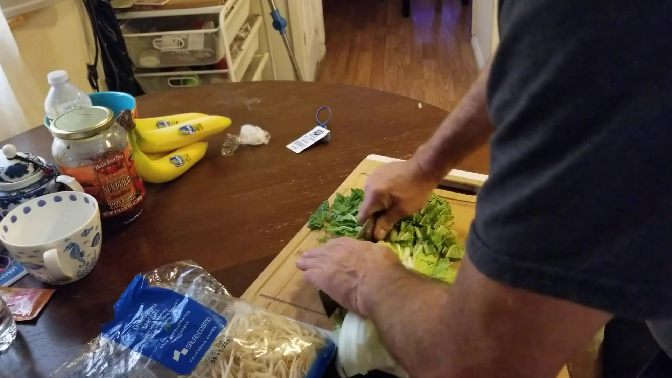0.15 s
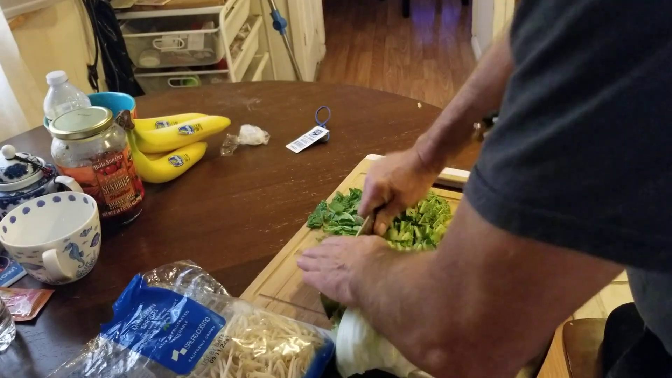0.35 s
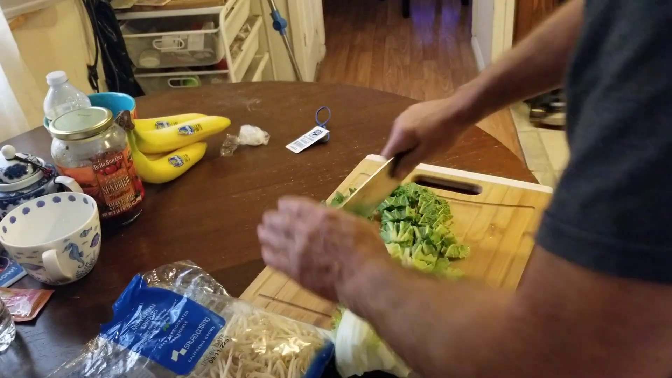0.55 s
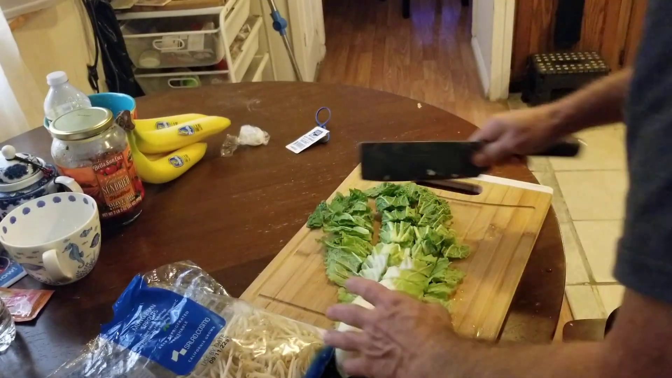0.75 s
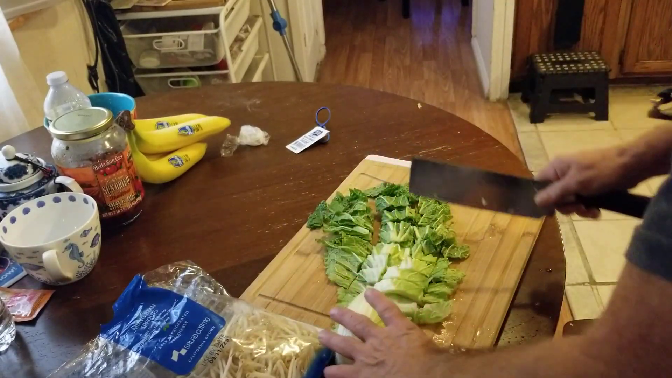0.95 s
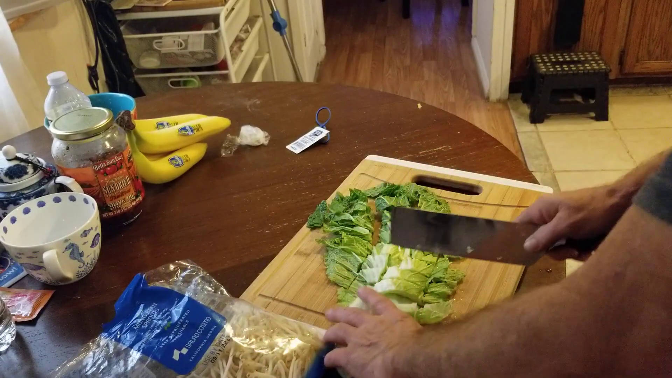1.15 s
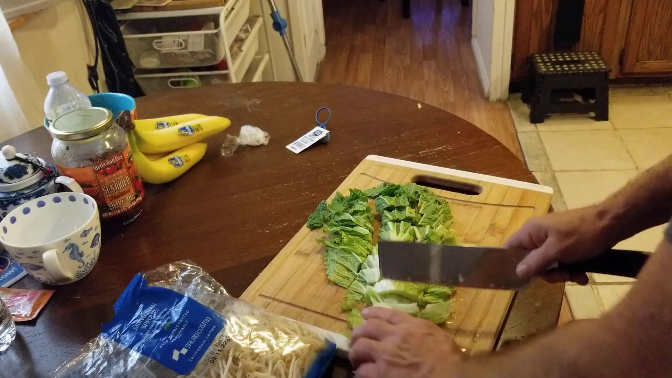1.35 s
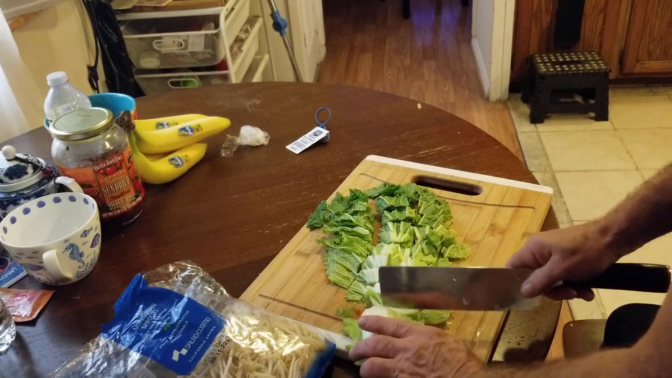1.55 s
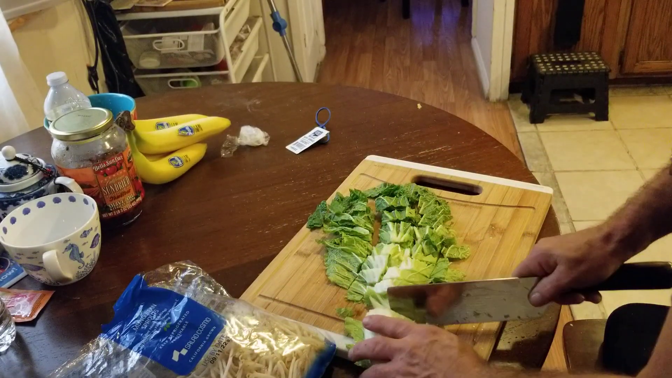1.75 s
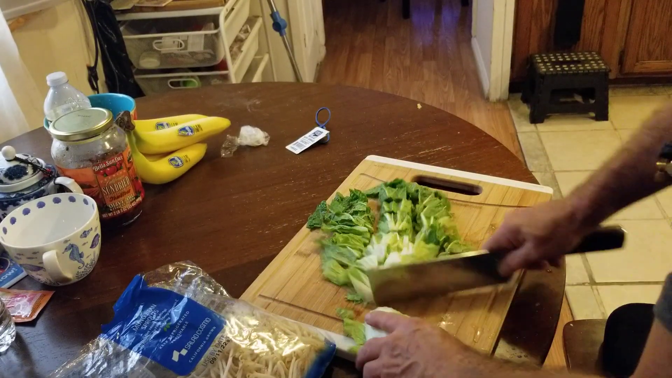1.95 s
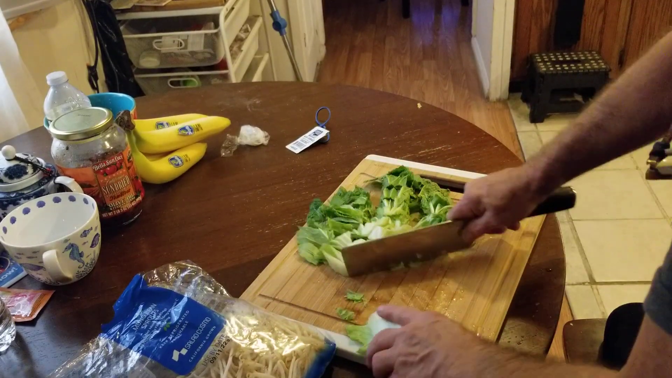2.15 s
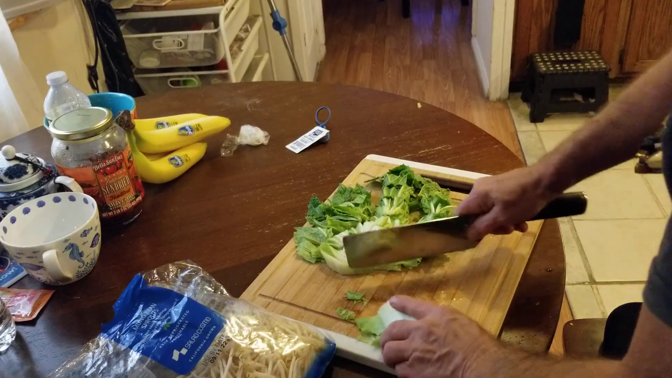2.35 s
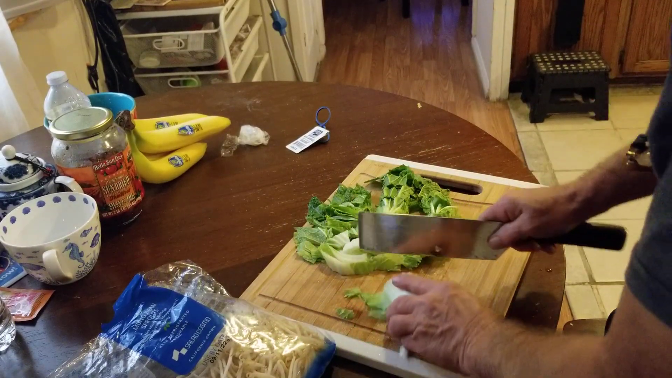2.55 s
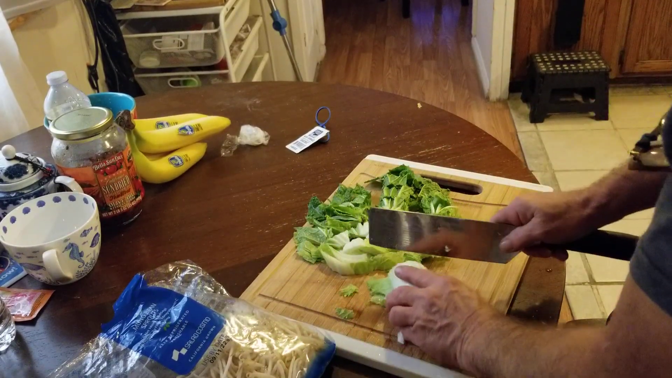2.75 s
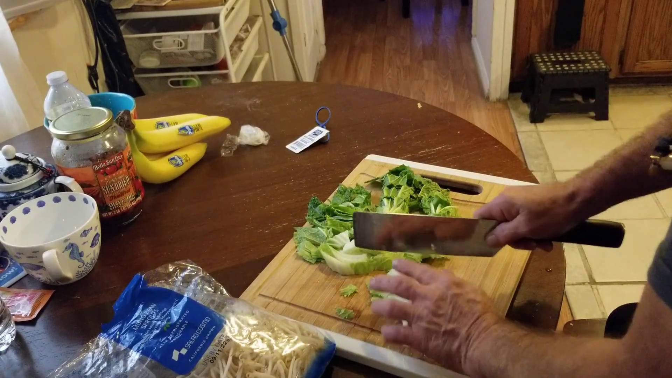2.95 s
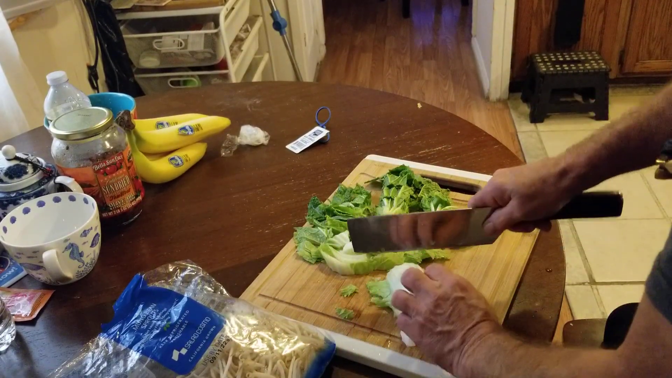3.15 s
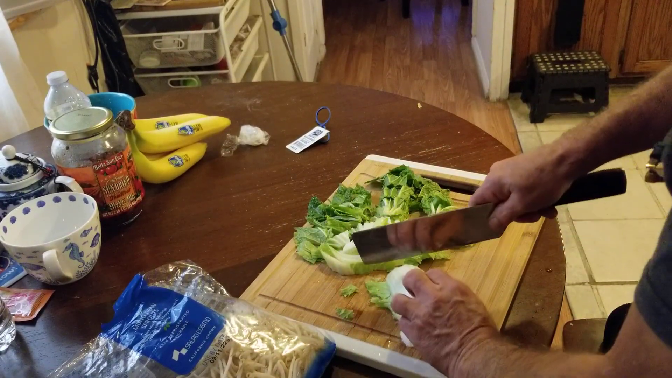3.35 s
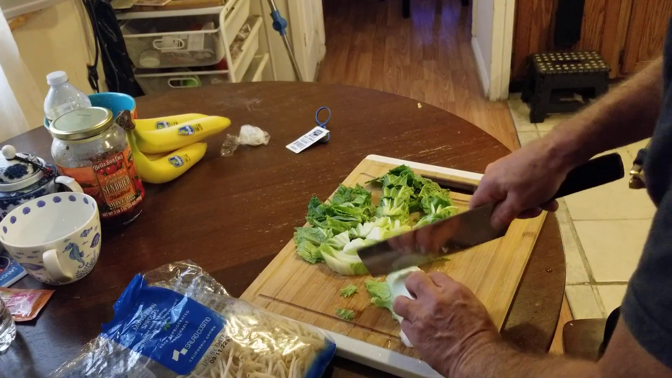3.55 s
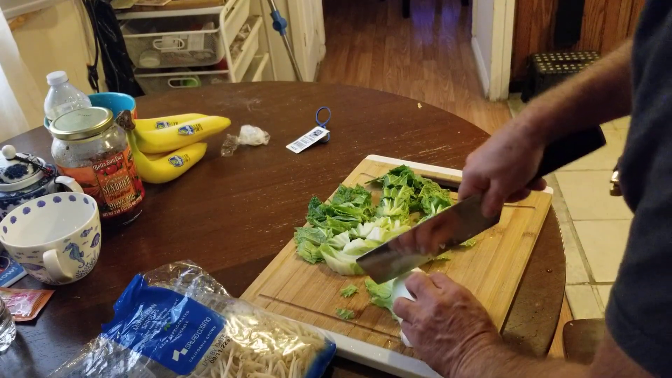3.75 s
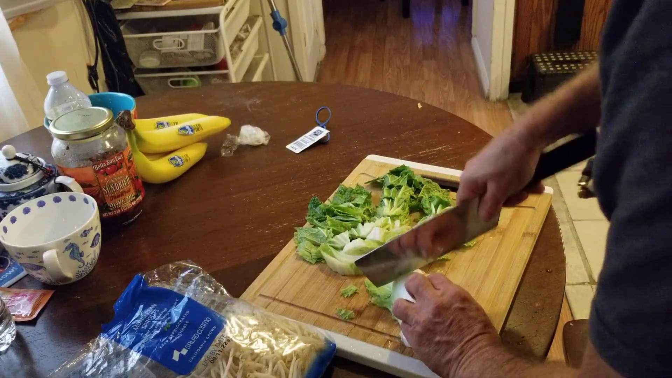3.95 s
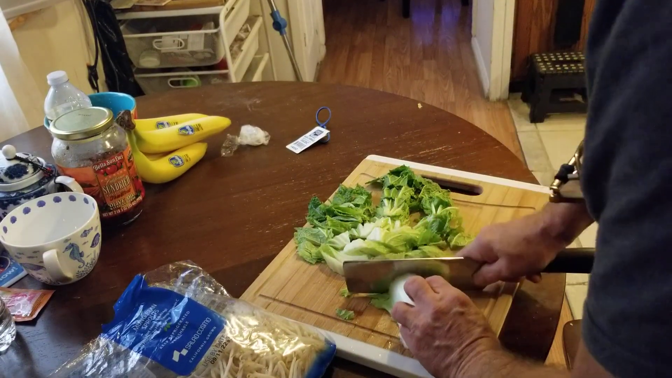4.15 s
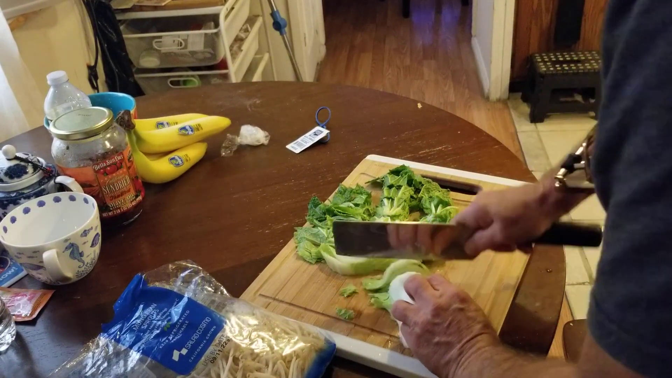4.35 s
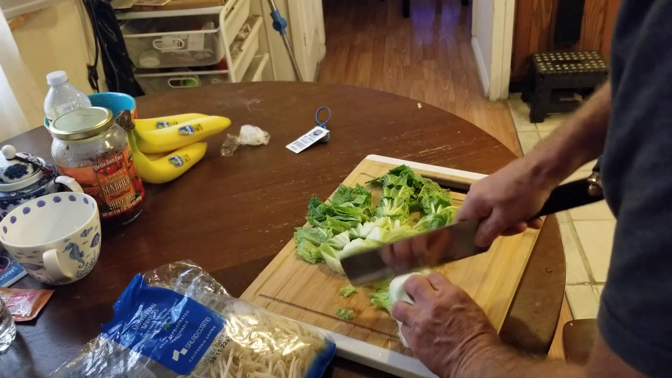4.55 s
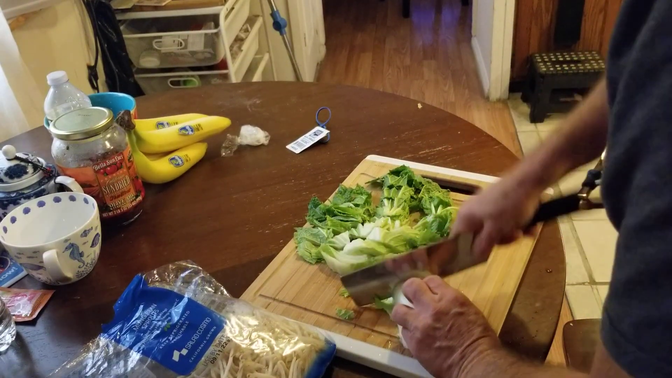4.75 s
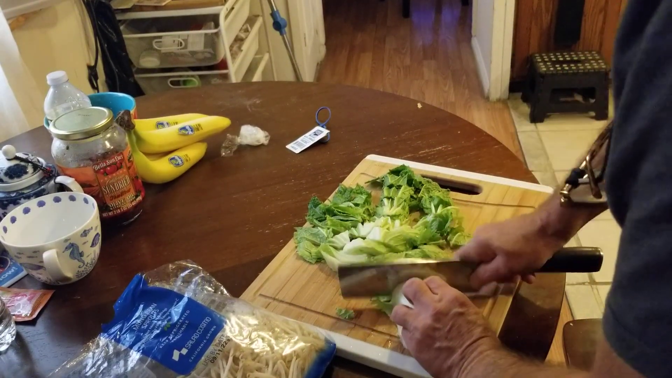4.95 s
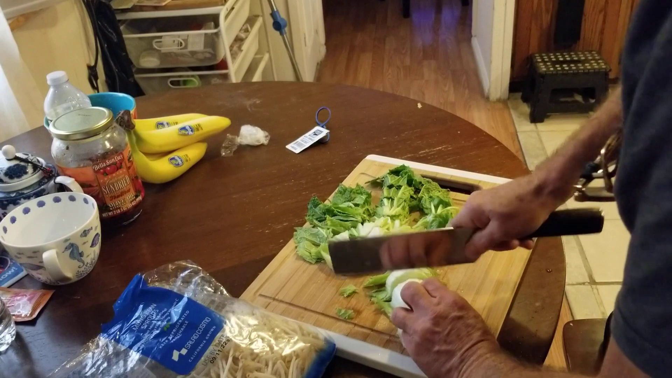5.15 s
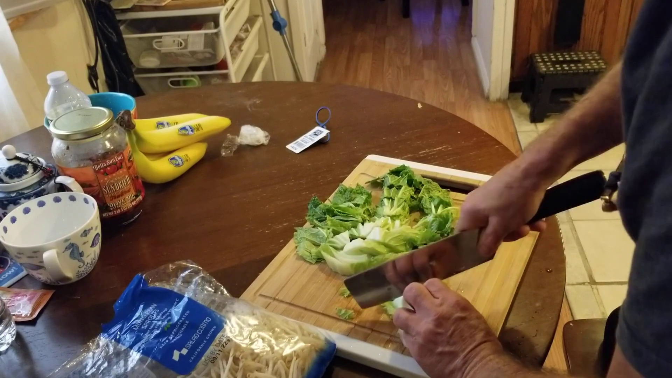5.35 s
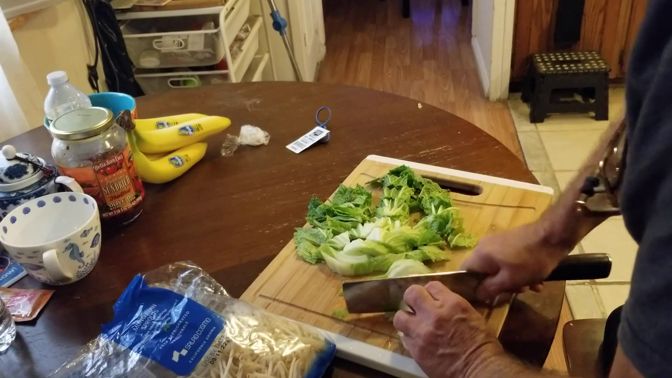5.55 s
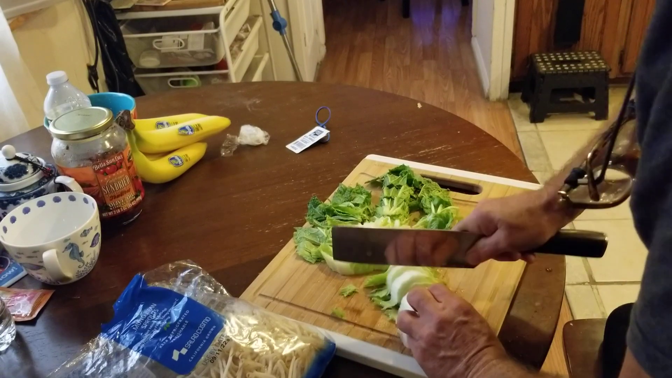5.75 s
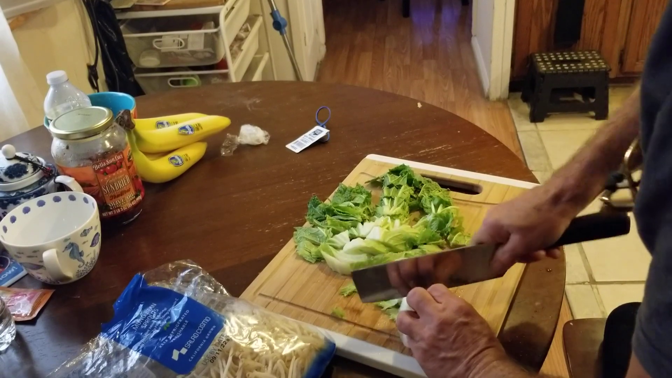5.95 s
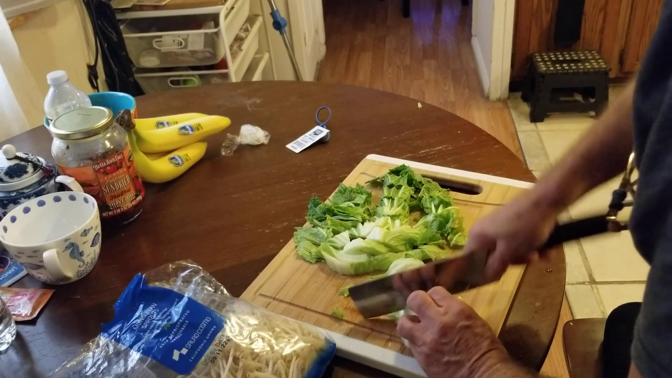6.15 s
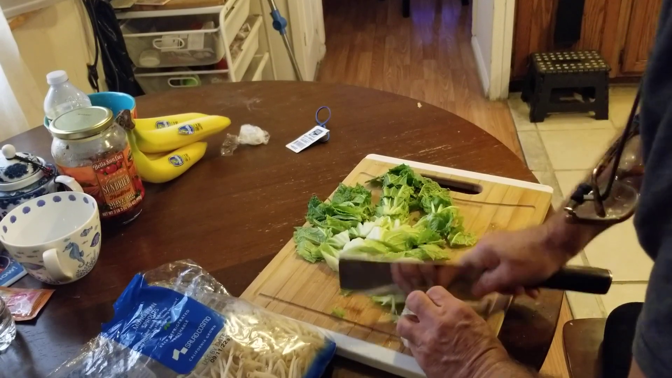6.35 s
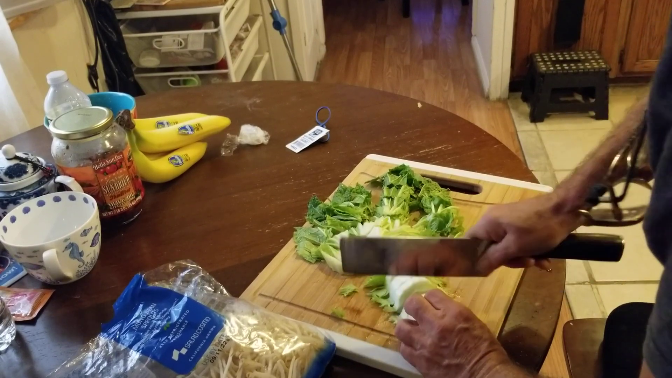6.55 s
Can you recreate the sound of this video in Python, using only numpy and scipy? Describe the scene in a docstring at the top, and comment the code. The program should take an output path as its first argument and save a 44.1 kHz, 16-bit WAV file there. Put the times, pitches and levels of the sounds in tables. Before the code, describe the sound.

Close by in a small, slightly echoing kitchen, cabbage leaves crunch and snap under a cleaver, then are pushed across a wooden board with a soft rustle and rasp. After three quick, dull background knocks, the blade goes through the firm stalk four times, each stroke led by a small nick and landing with a juicy crunch and a thud of the board. Quiet room tone and an appliance hum lie underneath.

```python
"""A cleaver chops cabbage on a bamboo board that lies on a kitchen table.
Leaves are sliced and pushed aside, then four strokes go through the stalk: cells burst and ribs
snap in a crunch, the board thumps in its modes, the steel edge clacks down.
A small live room answers. Behind it: three dull knocks, room tone and a humming appliance."""
import sys
import numpy as np
from scipy import signal
from scipy.fft import rfft, irfft, next_fast_len
from scipy.io import wavfile
from scipy.ndimage import map_coordinates

SR = 44100
rng = np.random.default_rng(int(sys.argv[2]) if len(sys.argv) > 2 else 0)


def wav_record(signal):
    """Record a signal, one row per channel, as 16-bit PCM in the file named by sys.argv[1]."""
    frames = np.transpose(np.atleast_2d(signal))
    bounded = np.clip(frames, -1, 1)
    # unit amplitude maps onto the largest positive 16-bit level
    quanta = np.round(bounded * 32767).astype(np.int16)
    wavfile.write(sys.argv[1], SR, quanta)


N = 290619
TIME = np.arange(N) / SR


def from_db(db):
    """Decibels to gain."""
    return 10 ** (np.asarray(db) / 20)


def rms_one(x):
    """Scale to unit rms."""
    return x / np.sqrt(np.mean(x ** 2) + 1e-20)


def at_hz(points, hz):
    """Interpolate (f, value) points over log frequency."""
    points = np.array(points)
    return np.interp(np.log(np.maximum(hz, 1)), np.log(points[:, 0]), points[:, 1])


def shaped(x, gain):
    """Zero-phase filter with response gain(hz)."""
    size = next_fast_len(x.shape[-1] + 2048)
    hz = np.arange(size // 2 + 1) * SR / size
    return irfft(rfft(x, size) * gain(hz), size)[..., :x.shape[-1]]


def coloured(x, spectrum, tilt_db_oct=0):
    """Filter by a tilted spectrum; unit rms."""
    octaves = lambda hz: np.log2(np.maximum(hz, spectrum[0][0]))
    return rms_one(shaped(x, lambda hz: from_db(at_hz(spectrum, hz) + tilt_db_oct * octaves(hz))))


def butter(x, order, hz, kind):
    """Causal Butterworth filter."""
    return signal.sosfilt(signal.butter(order, hz, kind, fs=SR, output="sos"), x)


def add(track, s, sound):
    """Mix a sound into a track at time s."""
    start = max(round(s * SR), 0)
    track[..., start:start + sound.shape[-1]] += sound[..., :N - start]


def grains(size, per_s, spread_db):
    """Random clicks of very uneven size."""
    sizes = from_db(spread_db * np.minimum(rng.exponential(1, size), 4))
    return (rng.random(size) < per_s / SR) * sizes * rng.choice([-1, 1], size)


def stroke(t, length_s, first_db, last_db, attack_s, release_s):
    """Envelope of one movement: attack, level ramp, release."""
    gate = np.minimum(t / attack_s, 1) * np.exp(-np.maximum(t - length_s, 0) / release_s)
    return gate * from_db(np.interp(t, [0, length_s], [first_db, last_db]))


def struck(blows, modes, vary_db, detune, t60_scale=1):
    """Each blow rings the modes a little differently; a soft contact low-passes them."""
    out, t = np.zeros(N), TIME[:SR // 2]
    hz, level_db, t60_s = np.array(modes).T[:, :, None]
    polarity = (-1) ** (np.arange(len(modes)) // 2)[:, None]
    decay = polarity * from_db(level_db) * np.exp(-np.log(1000) * t / (t60_s * t60_scale))
    for s, db, contact_hz in blows:
        stronger, higher = rng.standard_normal((2, len(modes), 1))
        ringing = decay * from_db(vary_db * stronger) * np.sin(2 * np.pi * hz * (1 + detune * higher) * t)
        add(out, s, from_db(db) * butter(ringing.sum(axis=0), 2, contact_hz, "low"))
    return out


def placed(x, lag_ms):
    """Stereo pair; the right microphone hears the sound later."""
    return np.array([x, map_coordinates(x, [(TIME - lag_ms / 1000) * SR], order=3)])


# room tone spectrum: f/Hz, level/dB
AIR_SPECTRUM = [(20, -50), (35, -11), (52, 1), (85, -2.5), (140, -10.5), (215, -1.5), (340, -5),
                (450, -6.5), (560, -14), (890, -14.5), (1400, -23.5), (2000, -33.5), (2600, -26.5),
                (3200, -40.5), (5000, -31), (8000, -70), (12500, -36.5), (16000, -36.5)]
# room tone: f/Hz, left-right coherence
AIR_COHERENCE = [(60, 0.84), (290, 0.91), (640, 0.47), (1400, 0), (16000, 0)]


def room_tone(level_db=-53.5):
    """Steady noise, alike on both sides in the bass."""
    mid, side = rng.standard_normal((2, N))
    mid = shaped(mid, lambda hz: np.sqrt(1 + at_hz(AIR_COHERENCE, hz)))
    side = shaped(side, lambda hz: np.sqrt(1 - at_hz(AIR_COHERENCE, hz)))
    return from_db(level_db) * coloured(np.array([mid + side, mid - side]), AIR_SPECTRUM)


# appliance tones: f/Hz, rms level/dB
HUM_LINES = [(58.5, -61.5), (118.4, -65.5), (209.9, -62), (339.1, -62.5), (452.2, -68.5)]


def appliance_hum(step_rad=0.73):
    """Unsteady tones, each with a random walk in phase."""
    out, knots_s = np.zeros(N), np.linspace(0, TIME[-1], 60)
    for hz, db in HUM_LINES:
        wander = step_rad * np.interp(TIME, knots_s, np.cumsum(rng.standard_normal(len(knots_s))))
        out += from_db(db) * np.sqrt(2) * np.sin(2 * np.pi * hz * TIME + wander)
    return out


# reflections off table, jars and cook: f/Hz, level/dB
EARLY_SPECTRUM = [(100, -27), (400, -34), (1000, -6), (2500, -4), (6000, -2.5), (16000, -11.5)]
# diffuse tail: f/Hz, level/dB, t60/s
TAIL_BANDS = [(100, -23, .42), (243, -41, 0.37), (493, -11, 0.43), (980, -1.5, 0.33), (2000, -2, 0.37),
              (4360, 0, 0.33), (8850, -6.5, 0.33), (15000, 2, 0.14)]


def kitchen_response(early_s=0.0057, build_s=0.0054):
    """Random stereo impulse response: near reflections, then a tail that decays by band."""
    t = TIME[:SR * 2 // 3]
    unit_energy = lambda envelope: envelope / np.sqrt(np.sum(envelope ** 2))
    near, far = rng.standard_normal((2, 2, len(t)))
    early = near * unit_energy(np.sqrt(t) * np.exp(-t / early_s))
    out = shaped(early, lambda hz: from_db(at_hz(EARLY_SPECTRUM, hz)))
    centres_hz = np.array(TAIL_BANDS)[:, 0]
    for (_, db, t60_s), weights in zip(TAIL_BANDS, np.eye(len(TAIL_BANDS))):
        band = shaped(far, lambda hz: at_hz(np.column_stack([centres_hz, weights]), hz))
        envelope = (1 - np.exp(-t / build_s)) * np.exp(-np.log(1000) * t / t60_s)
        out += from_db(db) * band * unit_energy(envelope)
    return out


def reverb(x):
    """The kitchen's answer to a source at one spot."""
    return signal.fftconvolve(x[None], kitchen_response(), axes=1)[:, :N]


def moving_reverb(x, spots=5, stay_s=1 / 48):
    """The contact point moves, so the sound crossfades round several room responses."""
    out = np.zeros((2, N))
    for spot in range(spots):
        distance = np.abs((TIME / stay_s - spot) % spots - 1)
        out += reverb(np.sqrt(np.maximum(1 - distance, 0)) * x)
    return out


# knocks away from the board: t/s, level/dB
KNOCKS = [(2.747, -40), (2.7952, -38.5), (2.9096, -41)]
# knock spectrum: f/Hz, level/dB
KNOCK_SPECTRUM = [(250, 10.5), (550, 11), (1100, 6), (1900, 6.5), (2400, -3.5), (3100, -2.5), (3900, -6),
                  (4500, -14), (5300, -39), (16000, -57)]


def distant_knocks(decay_s=0.0041, rattle_db=-14, rattle_s=0.038):
    """Dull noise bursts, each with a brief rattle after it."""
    out, t = np.zeros(N), TIME[:SR // 10]
    envelope = np.exp(-t / decay_s) + from_db(rattle_db) * np.exp(-t / rattle_s)
    for s, db in KNOCKS:
        add(out, s, from_db(db) * coloured(rng.standard_normal(len(t)), KNOCK_SPECTRUM) * envelope)
    return out


# leaves and blade pushed over the board: t/s, length/s, rub/dB, rustle/dB, rasp/dB
PUSHES = [(0, .36, -61, -68, -82), (1.28, .08, -65, -69, -90), (1.645, 0.13, -63, -70, -69.5),
          (1.866, 0.18, -63, -58.5, -55.5), (2.07, 0.14, -64.5, -68, -70), (2.327, 0.27, -61, -69.5, -73),
          (2.757, 0.085, -67, -75, -94), (3.87, 0.09, -68, -64.5, -72), (5.022, 0.15, -85, -68, -93),
          (6.335, 0.073, -68, -67, -90)]
# edge set on the stalk to aim: t/s, nick level/dB
AIMS = [(3.5781, -29.5), (4.5816, -26.5), (5.2625, -26), (5.9243, -35)]
# leaves on bamboo: f/Hz, level/dB
RUB_SPECTRUM = [(300, -11), (700, -1), (1200, -7), (1550, -4), (1850, -0.5), (2200, -8.5), (2900, -12.5),
                (4500, -28), (8000, -60), (16000, -44)]
# leaf rustle: f/Hz, level/dB
RUSTLE_SPECTRUM = [(1000, -20), (2800, -2.5), (4000, -3.5), (6000, -1), (9000, -6.5), (12500, 4),
                   (16000, -14)]
# edge on the grain: f/Hz, level/dB
RASP_SPECTRUM = [(1200, -20), (1800, -17), (2100, -8), (2600, 2), (3300, -3.5), (4000, 5), (4700, 0.5),
                 (6500, -3), (9000, -6), (16000, -11)]


def sliding(release_s=0.063, creep_rub_db=-67.5, creep_rustle_db=-61.5):
    """Wet leaves rub and rustle over bamboo while the edge rasps; a push slows as it goes."""
    rub, rustle, rasp = np.zeros((3, N))
    t = TIME[:SR]
    for s, length_s, rub_db, rustle_db, rasp_db in PUSHES:
        push = stroke(t, length_s, first_db=0, last_db=-2.5, attack_s=0.05, release_s=release_s)
        for track, db in (rub, rub_db), (rustle, rustle_db), (rasp, rasp_db):
            add(track, s, from_db(db) * push)
    creep = stroke(t, length_s=0.13, first_db=0, last_db=-4, attack_s=0.0072, release_s=release_s)
    for s, _ in AIMS:
        add(rub, s, from_db(creep_rub_db) * creep)
        add(rustle, s, from_db(creep_rustle_db) * creep)
    # floor: leaves shifting under the hand
    rub = np.hypot(rub, from_db(-78.5))
    rustle = np.hypot(rustle, from_db(-77.5))
    return (rub * coloured(grains(N, per_s=2500, spread_db=5), RUB_SPECTRUM)
            + rustle * coloured(grains(N, per_s=8300, spread_db=2.5), RUSTLE_SPECTRUM)
            + rasp * coloured(grains(N, per_s=6300, spread_db=3), RASP_SPECTRUM))


# slow cuts through leaves: t/s, length/s, end level/dB, tilt/(dB/oct)
SLICES = [(0.075, 0.029, -44, 0), (0.103, 0.063, -45.5, -7.5), (1.068, 0.068, -54.5, -2),
          (1.134, 0.057, -43, -0.7), (1.222, 0.042, -44.5, -0.7)]
# cells bursting: f/Hz, level/dB
CELL_SPECTRUM = [(300, -3.5), (700, -4), (1500, -1.5), (2300, -3), (3300, -13.5), (4800, -5.5),
                 (6500, -8.5), (9000, -13.5), (12500, -5), (16000, -20)]
# thick fibres parting: f/Hz, level/dB
FIBRE_SPECTRUM = [(400, -30), (900, -5), (1300, -1.5), (1650, 4), (2000, -1.5), (2500, 0.5), (3200, -4.5),
                  (5000, -20), (9000, -20)]


def crunch(chop_cuts, slice_swell_db=2.5, firm_db=-38):
    """Cuts burst cells, more of them when firm, and part fibres, louder when the cut is dull."""
    out, t = np.zeros(N), TIME[:SR // 4]
    slices = [(s, length_s, db - slice_swell_db, db, tilt) for s, length_s, db, tilt in SLICES]
    for s, length_s, first_db, last_db, tilt_db_oct in chop_cuts + slices:
        envelope = stroke(t, length_s, first_db, last_db, attack_s=0.0011, release_s=0.012)
        firmness = from_db(max(first_db, last_db) - firm_db)
        cells = coloured(grains(len(t), per_s=4000 * firmness, spread_db=4.5), CELL_SPECTRUM, tilt_db_oct)
        fibres = coloured(grains(len(t), per_s=240, spread_db=4), FIBRE_SPECTRUM)
        fibre_db = -4.5 - 0.53 * max(tilt_db_oct, -1)
        add(out, s, envelope * (cells + from_db(fibre_db) * fibres))
    return butter(out, 2, 110, "high")


# ribs snapping, and sharp ticks as the edge taps the board: t/s, level/dB, centre f/Hz
SNAPS_AND_TICKS = [(0.0985, -19.5, 8000), (1.12, -28, 2980), (1.163, -31, 4370), (1.179, -25, 1800),
                   (1.19, -20.5, 4500), (1.2251, -18, 4900), (1.232, -19, 4750), (1.2432, -17, 8000),
                   (1.535, -29, 7100), (1.627, -37.5, 8000), (4.074, -18, 1800), (4.0833, -18.5, 1690),
                   (4.7987, -15, 1900), (5.4456, -15.5, 4700), (6.1775, -18, 5500)]


def snaps_and_ticks(skin_splits, nick_hz=7040, band_ratio=2.22, tail_db=-16, tail_s=0.002):
    """Skin or rib gives way, or the edge ticks on the board: a sharp crack with a brief noise tail."""
    out, t = np.zeros(N), TIME[:SR // 40]
    nicks = [(s, db, nick_hz) for s, db in AIMS]
    for s, db, hz in skin_splits + SNAPS_AND_TICKS + nicks:
        band_hz = [hz / band_ratio, min(hz * band_ratio, SR / 2.5)]
        crack = butter(signal.unit_impulse(len(t)), 1, band_hz, "band")
        noise = rms_one(butter(rng.standard_normal(len(t)), 1, band_hz, "band"))
        tail = from_db(tail_db) * noise * np.exp(-t / tail_s)
        add(out, s, from_db(db) * (crack / np.abs(crack).max() + tail))
    return out


# cleaver pressed on the board: f/Hz, level/dB, t60/s
BLADE_MODES = [(751, -24.5, 0.08), (960, -10, 0.021), (1378, -6, 0.0096), (1625, -12, 0.018),
               (1708, -10, 0.024), (2020, -8.5, 0.023), (2510, -10, 0.018), (3460, -37, 0.0053),
               (4460, -5, 0.014), (5470, 6, 0.0031)]
# light taps of the edge: t/s, level/dB, contact cut-off/Hz
EDGE_TAPS = [(0.16, -53, 2000), (0.2598, -40.5, 3050), (0.354, -45.5, 3940), (1.5323, -35, 2130),
             (1.625, -47.5, 4000), (2.3146, -37, 2400)]


def blade_ring(clacks):
    """The steel rings briefly at each clack and tap."""
    steel = struck(clacks + EDGE_TAPS, BLADE_MODES, vary_db=1.5, detune=0.033)
    return butter(steel, 2, 350, "high")


# board against table top: f/Hz, level/dB
CLATTER_SPECTRUM = [(170, -50), (290, -2), (430, -3.5), (520, -4.5), (720, -2.5), (1000, -9), (1500, -10.5),
                    (2400, -12), (5000, -30)]


def board_clatter(blows, gain_db=-17, decay_s=0.017):
    """The board clatters on the table in many short resonances; a soft contact keeps it dull."""
    out, t = np.zeros(N), TIME[:SR // 8]
    for s, db, contact_hz in blows:
        burst = coloured(rng.standard_normal(len(t)), CLATTER_SPECTRUM) * np.exp(-t / decay_s)
        add(out, s, from_db(db + gain_db) * butter(burst, 2, contact_hz, "low"))
    return out


# board on the table: f/Hz, level/dB, t60/s
BOARD_MODES = [(113, -70, 0.12), (156, -46.5, 1), (179.2, -32, 0.27), (232.3, -17.5, 0.37),
               (279, -22, 0.15), (310.6, -28.5, 0.16), (348, -21, 0.32), (379.6, -18, 0.13),
               (428.5, -19, 0.18), (521.6, -16.5, 0.086), (597.3, -22, 0.17), (666, -56, 0.051),
               (712.5, -21, 0.092), (800.8, -21.5, 0.092), (784, -48, 0.068), (885, -24, 0.38),
               (958, -26, 0.077), (1165, -29, 0.071), (1255, -23, 0.094), (1375, -28, 0.063),
               (1453, -30, 0.025), (1760, -22.5, 0.045), (2295, -16, 0.029)]
# hand or cleaver jogs the board: t/s, level/dB, contact cut-off/Hz
BOARD_BUMPS = [(0.0, -19.5, 610), (0.098, -22, 470), (0.158, -34, 400), (1.0294, -37, 1000),
               (4.0222, -5.5, 370)]


def board_thuds(thumps, presses, radiation_hz=135):
    """The board rings, more briefly under the resting edge; a small plate radiates little bass."""
    blows = thumps + BOARD_BUMPS
    free = struck(blows, BOARD_MODES, vary_db=3, detune=0.0082)
    pressed = struck(presses, BOARD_MODES, vary_db=3, detune=0.031, t60_scale=0.74)
    return butter(free + pressed + board_clatter(blows + presses), 4, radiation_hz, "high")


# strokes through the stalk: split t/s, blow t/s, landing t/s, bite/dB, split/dB, blow/dB,
# blow cut-off/Hz, tear/dB, tear tilt/(dB/oct), landing/dB, landing cut-off/Hz, settle/dB, strands/dB
CHOPS = [(3.992, 4.008, 4.131, -51, -17, -9, 500, -39.5, -1.3, -35, 3000, -18, -41),
         (4.736, 4.7503, 4.8447, -41.5, -17.5, -3, 600, -36.5, -0.5, -7, 1700, -14.5, -34.5),
         (5.388, 5.4006, 5.5147, -49, -27, -2.5, 750, -35, -1.3, -10.5, 2720, -12.5, -32),
         (6.128, 6.1336, 6.232, -44.5, -19.5, -1.5, 1080, -41, -0.4, -33, 3000, -12.5, -41)]


def chop_events(bite_s=0.024, squash_s=0.044, strands_s=0.067, settle_s=0.016, split_hz=8100):
    """Each chop bites, splits the skin, thumps the board, squashes and tears the stalk, then lands."""
    cuts = []  # t/s, length/s, first level/dB, last level/dB, tilt/(dB/oct)
    splits, thumps, presses, clacks = [], [], [], []  # t/s, level/dB, f/Hz
    for (split_t, blow_t, land_t, bite_db, split_db, blow_db, blow_hz,
         tear_db, tear_tilt, land_db, land_hz, settle_db, strands_db) in CHOPS:
        squash_db = -34 + 0.5 * blow_db
        cuts += [(split_t - bite_s, bite_s, bite_db - 19.5, bite_db, 1.5),
                 (split_t, blow_t - split_t, -38, -38, 0),  # skin opens
                 (blow_t, squash_s, squash_db, squash_db + 0.5, -3.5),
                 (blow_t + squash_s, land_t - blow_t - squash_s, tear_db, tear_db, tear_tilt),
                 (land_t, strands_s, strands_db, strands_db - 10, -3.5)]  # last strands part
        splits.append((split_t, split_db, split_hz))
        thumps.append((blow_t, blow_db, blow_hz))
        clacks.append((land_t, land_db, land_hz))
        presses.append((land_t, land_db - 8, 1100))
        presses.append((land_t + settle_s, settle_db, 390))  # arm weight follows the edge
        for snap_t, snap_db, _ in SNAPS_AND_TICKS:
            if blow_t < snap_t < land_t:  # a snap in mid-chop jolts board and blade
                thumps.append((snap_t, snap_db - 1, 477))
                clacks.append((snap_t, snap_db - 5.5, 2300))
    return cuts, splits, thumps, presses, clacks


def scene(board_wet_db=0.5, knock_direct_db=-5.5, roam_ms=0.11):
    """Board, blade and cabbage close by, the room around them."""
    cuts, splits, thumps, presses, clacks = chop_events()
    board = board_thuds(thumps, presses)
    blade = blade_ring(clacks)
    cutting = crunch(cuts) + snaps_and_ticks(splits) + sliding()
    knocks = distant_knocks()
    roam = signal.resample(rng.standard_normal(N // 1000), N)  # contact point runs along the blade
    direct = (placed(board, lag_ms=0.13)
              + placed(blade + cutting, lag_ms=0.046 + roam_ms * roam)
              + from_db(knock_direct_db) * placed(knocks, lag_ms=0.25))
    echoes = from_db(board_wet_db) * reverb(board) + moving_reverb(blade + cutting + knocks)
    return direct + echoes + room_tone() + appliance_hum()


# microphone ports: f/Hz, left minus right/dB
PORT_BALANCE = [(100, 1), (700, 1.7), (1300, 2.5), (2400, .5), (4400, -4), (8000, 2.5), (15000, 2)]


def record(dry, cutoff_hz=16000):
    """The two microphone ports colour the sound differently; a steep low-pass cuts the top."""
    heard = shaped(dry, lambda hz: from_db(at_hz(PORT_BALANCE, hz) * np.array([[0.5], [-0.5]])))
    return signal.sosfilt(signal.ellip(12, 0.1, 80, cutoff_hz, fs=SR, output="sos"), heard)


dry = scene()
out = record(dry)
wav_record(out)
```